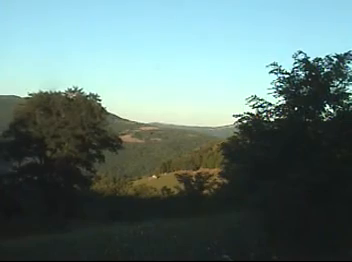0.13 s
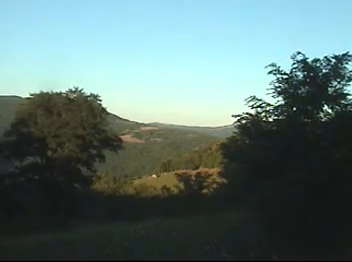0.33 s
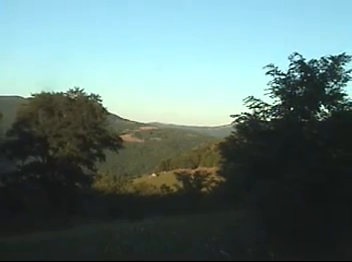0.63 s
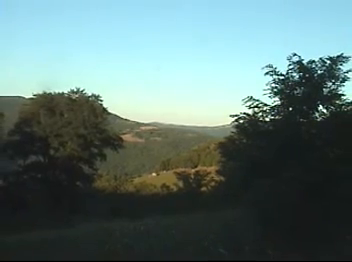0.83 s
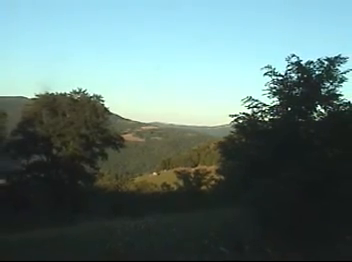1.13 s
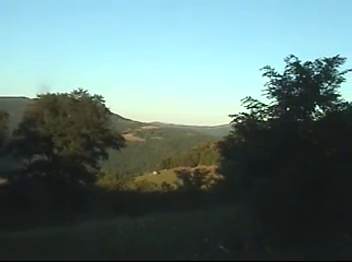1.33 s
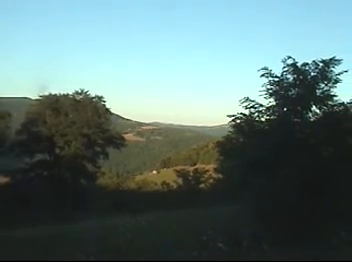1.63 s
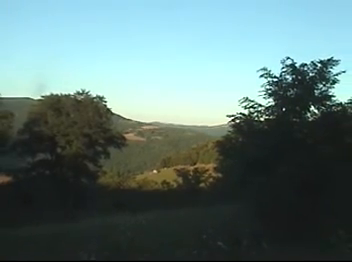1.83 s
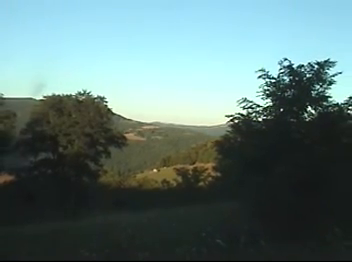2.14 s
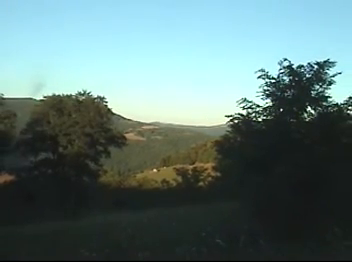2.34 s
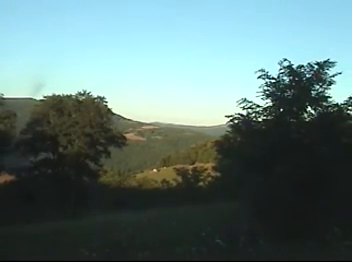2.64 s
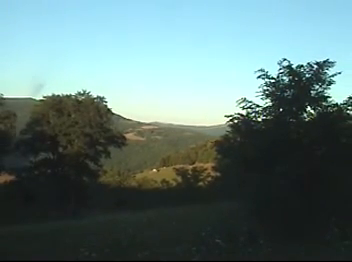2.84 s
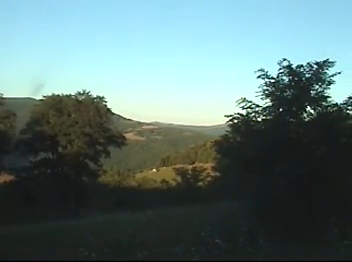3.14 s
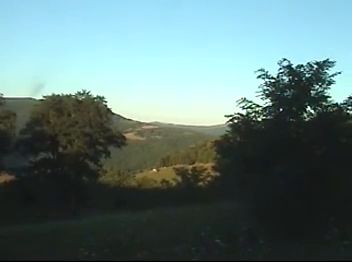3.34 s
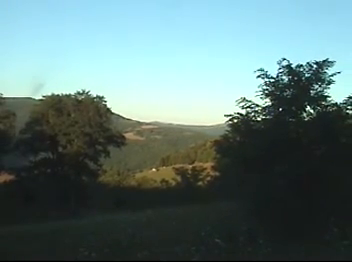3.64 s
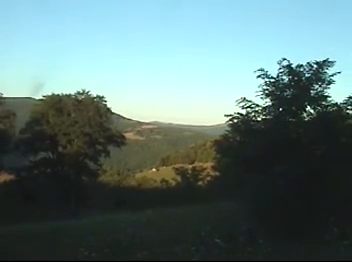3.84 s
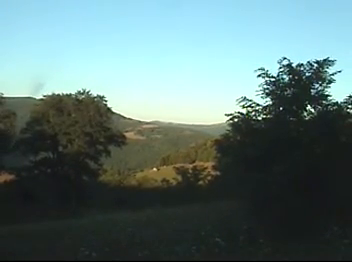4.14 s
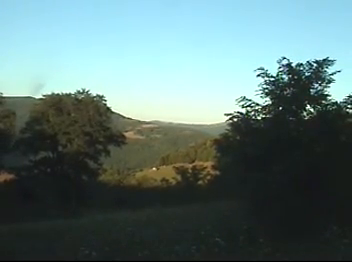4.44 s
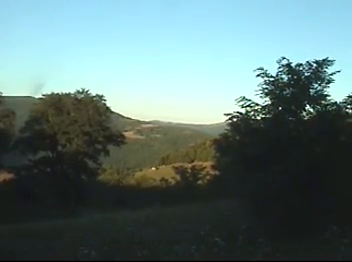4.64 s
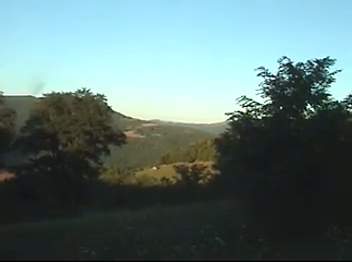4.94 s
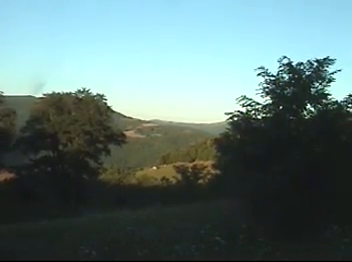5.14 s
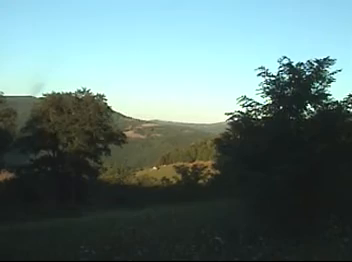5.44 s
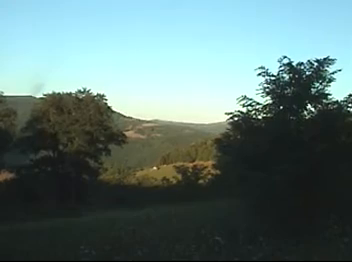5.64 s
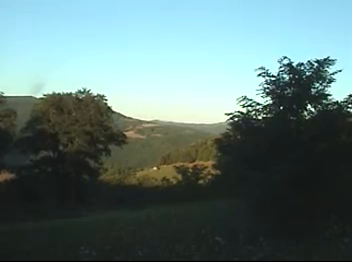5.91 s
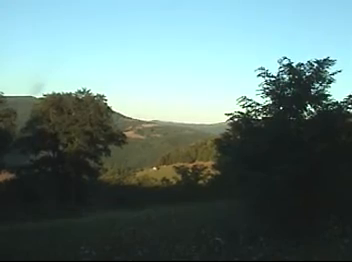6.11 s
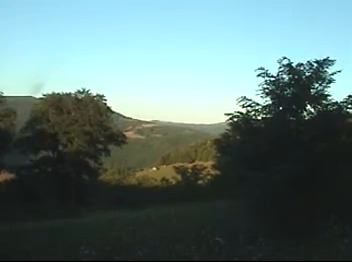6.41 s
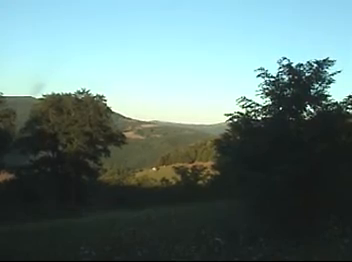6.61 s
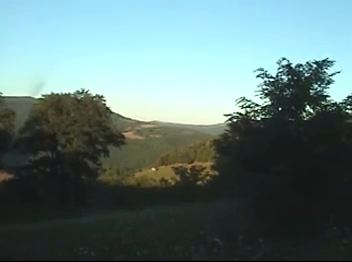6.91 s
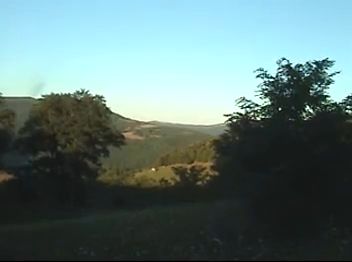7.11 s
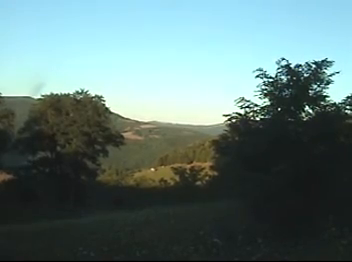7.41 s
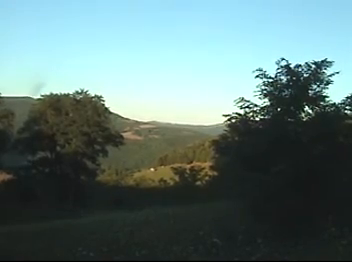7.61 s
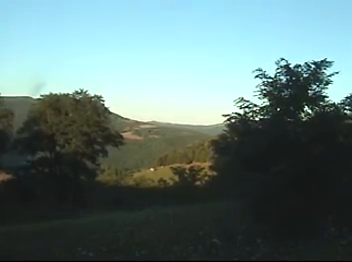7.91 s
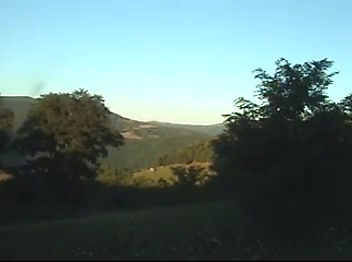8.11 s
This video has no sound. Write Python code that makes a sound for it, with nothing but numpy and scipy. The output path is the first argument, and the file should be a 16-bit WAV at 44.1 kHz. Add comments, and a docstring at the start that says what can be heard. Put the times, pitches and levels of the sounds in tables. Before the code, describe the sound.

Open hillside insects in stereo, with no wind gusts. Near cricket chirps of a few quick pulses lean slightly right, answered by a higher cricket near the centre. A high trill on the left stops after two seconds and a lower one takes over, pausing briefly near six seconds. Crisp rasping runs throughout above a hazy far chorus. Soft camera noise lies beneath, with light handling bumps just before five seconds.

```python
"""A hillside meadow at dusk. Two near crickets answer each other in short chirps of falling wing strokes,
and softer chirps come from further off. Smaller crickets trill higher up, and a far chorus fills the valley.
A bush-cricket rasps six times a second: runs of tooth clicks shape a bright hiss, each closed by a tick.
Shaped noise makes the air. The camcorder's tape motor whines as faint steady tones. Its case is scuffed
(fading noise) and later knocked (ringing resonances); a short bright click of noise is heard in between."""
import sys
import numpy as np
from scipy import signal
from scipy.fft import rfft, irfft, next_fast_len
from scipy.io import wavfile

SR = 44100
rng = np.random.default_rng(int(sys.argv[2]) if len(sys.argv) > 2 else 0)


def master_out(mix):
    """Clip the mix to full scale and print it as 16-bit PCM to the path in sys.argv[1]."""
    frames = np.transpose(np.atleast_2d(mix))
    ceiling = np.clip(frames, -1, 1)
    pcm = np.round(ceiling * 32767).astype(np.int16)
    wavfile.write(sys.argv[1], SR, pcm)


N = 364266
T = np.arange(N) / SR


def undb(db):
    """Turn decibels into a gain."""
    return 10 ** (np.asarray(db) / 20)


def unit(x):
    """Scale a sound to an rms of 1."""
    return x / np.sqrt(np.mean(x ** 2))


def add(track, start_s, sound):
    """Mix a sound into a track, dropping what falls outside it."""
    i = int(round(start_s * SR))
    first, last = max(i, 0), min(i + len(sound), N)
    if last > first:
        track[first:last] += sound[first - i:last - i]


def colour(x, points):
    """Shape a sound's spectrum by (pitch_hz, level_db) points, at an rms of 1."""
    hz, db = np.transpose(points)
    f = np.maximum(np.fft.rfftfreq(N, 1 / SR), 1)
    # above the last point the level drops by 29 dB
    level_db = np.interp(np.log(f), np.log(hz), db, right=db[-1] - 29)
    return unit(irfft(rfft(x) * undb(level_db), N))


def band(x, lo_hz, hi_hz):
    """Keep a band of pitches, with gentle edges."""
    edges = [lo_hz, min(hi_hz, .48 * SR)]
    return signal.sosfilt(signal.butter(2, edges, "band", fs=SR, output="sos"), x)


def place(x, pan_db, lead=.3):
    """Spread a sound over two microphones; the left is pan_db louder and leads by a phase in radians."""
    z = signal.hilbert(x, next_fast_len(N))[:N]
    left = np.real(z * np.exp(.5j * lead)) * undb(pan_db / 2)
    right = np.real(z * np.exp(-.5j * lead)) * undb(-pan_db / 2)
    return np.array([left, right])


def foliage(x, t60_s):
    """Scatter a sound from leaves and slopes: a fading noise tail, different at each microphone."""
    t = T[:SR // 2]
    tail = rng.standard_normal((2, len(t))) * undb(-60 * t / t60_s)
    tail = tail * (t > .008)  # the first 8 ms stay silent
    tail = tail / np.sqrt(np.sum(tail ** 2, axis=1, keepdims=True))
    return signal.fftconvolve(x[None], tail)[:, :N]


def beats(curve):
    """Count off a curve of (time_s, beats_per_s, values ..): one row (time_s, values ..) for each beat."""
    s, rate, *values = np.transpose(curve)
    t = np.linspace(s[0], s[-1], N // 100)
    turns = np.r_[0, np.cumsum(np.interp(t[1:], s, rate) * np.diff(t))]
    times = np.interp(np.arange(turns[-1]), turns, t)
    return np.column_stack([times] + [np.interp(times, s, v) for v in values])


def vary(strokes, looseness=1):
    """Let each wing stroke stray a little in length, pitch and level, as no two are quite alike."""
    # spreads at looseness 1; the length spread is a share of the length
    spread_db, spread_hz, length_spread = 0.32, 13.5, 0.052
    chance = looseness * rng.standard_normal((len(strokes), 3))
    return [(s, length_s * (1 + length_spread * a), hz + spread_hz * b, db + spread_db * c)
            for (s, length_s, hz, db), (a, b, c) in zip(strokes, chance)]


def chirp(pattern, s, hz, db):
    """List the wing strokes of one chirp at a given time, pitch and level."""
    strokes = [(s + offset_s, length_s, hz + up_hz, db + up_db)
               for offset_s, length_s, up_hz, up_db in pattern]
    return vary(strokes)


def trill(curve, length_s, looseness):
    """List an unbroken run of wing strokes that follows a singer's pace, pitch and level."""
    return vary([(s, length_s, hz, db) for s, hz, db in beats(curve)], looseness)


def stroke(length_s, hz, rise, fall, rough, overtone_db, skew):
    """Sound one wing closure: the scraper drives the wing at the tooth rate, and slows towards the end."""
    # upper resonances of a cricket's wing: centre_hz [Hz], width_hz [Hz], gain [factor]
    wing = [(7870, 370, 4.8), (8930, 133, 2.46)]
    count = max(int(length_s * SR), 64)
    u = np.arange(count) / count  # progress through the stroke, 0 to 1
    unevenness = np.interp(u * length_s, np.arange(64) / 1000, rng.standard_normal(64))
    pitch = hz * (1 - rise * (1 - u) ** 3 - fall * length_s * u ** 3 + rough * unevenness)
    phase = 2 * np.pi * (np.cumsum(pitch) / SR + rng.random())
    swell = np.abs(np.sin(np.pi * u ** skew)) ** .72 * (1 + .04 * unevenness)
    # the overtone flares as it slides through the wing's upper resonances
    flare = 1 + sum(gain / (1 + (2 * (2 * pitch - centre) / width) ** 2) for centre, width, gain in wing)
    overtone = undb(overtone_db) * flare * swell * np.sin(2 * phase)
    return swell * (np.sin(phase) + overtone)


def song(strokes, fall, rough, overtone_db, skew=(1.2, .8), rise=0):
    """Play wing strokes; each starts flat by the share rise and sinks by fall, a share per second of length."""
    out = np.zeros(N)
    for s, length_s, hz, db in strokes:
        # skew goes from short strokes to long ones: above 1 the swell peaks late, below 1 early
        shape = np.interp(length_s, (.021, .029), skew)
        add(out, s, undb(db) * stroke(length_s, hz, rise, fall, rough, overtone_db, shape))
    return out


def air():
    """Soft outdoor rumble and hiss: noise with its own spectrum at each microphone."""
    # still air and microphone hiss, before each side is set to its own level:
    # pitch_hz [Hz], relative level_db [dB], left minus right pan_db [dB]
    air_spectrum = [(25.5, -11, 2), (45.6, -6, 2), (103, -1, -0.5), (191, -2, -1.5), (322, 1, -3),
                    (571, 1, -3.5), (1000, -2.5, 1.5), (2080, -7, -5), (2600, -6, -3), (3100, -9, -4.5),
                    (3950, -5.5, -4), (7850, -9.5, 0), (9900, -8.5, -0.5), (11400, -10.5, 2),
                    (13800, -11.5, -1.5)]
    mid, side = rng.standard_normal((2, N))
    # widened stereo: more side sound in this band sets the two microphones against each other
    side = side + undb(-8) * band(side, 73, 3200)
    left = colour(mid + side, [(hz, db + pan_db / 2) for hz, db, pan_db in air_spectrum])
    right = colour(mid - side, [(hz, db - pan_db / 2) for hz, db, pan_db in air_spectrum])
    return np.array([undb(-59.0) * left, undb(-57.5) * right])


def motor():
    """The tape drive's steady tones waver a little and reach both microphones through the case."""
    # tape motor and mains tones: pitch_hz [Hz], base level_db [dB rms, before the wavering below]
    motor_tones = [(60, -83), (922, -79), (1093, -81), (1378, -75.5), (1791, -86), (2327, -85), (2490, -87),
                   (2620, -86), (2687, -86), (2756, -84), (2912, -86), (3493, -86), (6891, -86),
                   (12403, -87)]
    # extra level of the tones near 1 kHz, which grow louder: time_s [s], level_db [dB]
    grip = [(0, -5), (2.2, -2), (3.0, 1.5), (8.2, 1)]
    whine = np.zeros((2, N))
    grip_db = np.interp(T, *np.transpose(grip))
    knots_s = np.linspace(0, T[-1], 80)
    for hz, db in motor_tones:
        flutter, left, right = (np.interp(T, knots_s, r) for r in rng.standard_normal((3, 80)))
        phase = 2 * np.pi * (np.cumsum(hz + 1.17 * flutter) / SR + rng.random())
        gripped = 800 < hz < 1200
        level_db = db + gripped * grip_db + 2.4 * np.array([left, right])
        whine += np.sqrt(2) * undb(level_db) * np.sin(phase)
    return whine


def chorus(count=20):
    """Many distant crickets chirp at their own pitch and pace, over a noise haze of still more."""
    # blurred song of the whole valley: pitch_hz [Hz], relative level_db [dB]
    valley = [(3500, -28), (4000, -15), (4400, -1.5), (4620, -8.5), (4850, -14.5), (5050, -3), (5450, -17),
              (5850, -14), (6300, -6.5), (6650, -15.5), (7100, -15.5)]
    strokes = []
    for pitch, (pace, offset) in zip(np.linspace(0, 1, count), rng.random((count, 2))):
        interval_s = .45 + .2 * pace
        for chirp_s in (np.arange(-1, 19) + offset) * interval_s:
            start = chirp_s + 0.033 * rng.standard_normal()
            hz = 4680 + 400 * pitch + 25 * rng.standard_normal()
            # three strokes climb in pitch and level; higher singers are softer
            strokes += [(start + .052 * k, .025, hz + 30 * k, k - 4 * pitch ** 2) for k in range(3)]
    voices = unit(song(strokes, fall=4.83, rough=0.003, overtone_db=-14.5))
    # part of the haze is shared by both sides, part is separate
    haze = colour(rng.standard_normal(N) + 1.26 * rng.standard_normal((2, N)), valley)
    singers = place(voices, pan_db=0.5) + 0.8 * foliage(voices, t60_s=0.41)
    return undb(-63.0) * singers + undb(-61.0) * haze


def bush_cricket(length_s=0.072, snap_db=5, snap_s=0.0037):
    """A swelling run of tooth clicks on a damped wing, closed by one bright falling tick."""
    # pace and effort: rasp end_s [s], rasps_per_s [1/s], base level_db [dB, before random spread and mix]
    rasping = [(0.055, 5.98, -62.0), (0.7, 6.4, -62.5), (1.2, 6.15, -60.0), (2.3, 6.02, -61),
               (2.65, 5.44, -64), (3.2, 6.15, -63), (4.45, 6.19, -62.5), (5.6, 6.17, -64.5),
               (5.8, 6.14, -59.5), (7.2, 6.11, -61.5), (7.7, 6.06, -67.5), (8.0, 6.2, -62),
               (8.26, 5.49, -62)]
    tooth_hz, click_decay_s, spread_db = 520, .0009, 1.0
    teeth, snaps = np.zeros(N), np.zeros(N)
    t = T[:int(snap_s * SR)]
    snap = np.hanning(len(t)) * signal.chirp(t, 14000, snap_s, 9600)
    for s, db in beats(rasping):
        db = db + spread_db * rng.standard_normal()
        chance = rng.standard_normal((2, 64))
        # the teeth are counted backwards from the end of the rasp, in seconds
        before = 0.0037 + np.cumsum(1 + .06 * chance[0]) / tooth_hz
        force = np.clip(1 - before / length_s, 0, 1) ** .5 * undb(db + chance[1])
        at = np.round((s - before) * SR).astype(int)
        heard = (at >= 0) & (at < N)
        teeth[at[heard]] += force[heard]
        add(snaps, s - snap_s, undb(db + snap_db + 2 * rng.standard_normal()) * snap)
    # each click dies away quickly and shapes a bright hiss
    ring = signal.lfilter([1], [1, -np.exp(-1 / (click_decay_s * SR))], teeth)
    rasp = ring * unit(band(rng.standard_normal(N), 9350, 12600))
    return place(undb(4.5) * rasp + snaps, pan_db=4.5, lead=0.34)


def trillers():
    """Smaller crickets stroke in long even runs; a weaker low one joins, and the high one returns softly."""
    # the next three tables: time_s [s], strokes_per_s [1/s], pitch_hz [Hz], level_db [dB peak, before mix]
    # the high triller on the left hurries once and pauses after two seconds
    high_trill = [(0.028, 14.13, 6700.0, -55.2), (0.47, 15.2, 6650.0, -54.7), (0.59, 17.71, 6570.0, -55.2),
                  (0.73, 14.05, 6650.0, -54.7), (1.6, 13.51, 6680.0, -55.2), (2.15, 14.35, 6640.0, -53.7)]
    # two bouts of the lower triller; each starts fast and flat, then slows as its pitch rises
    first_bout = [(1.4, 13.78, 6110, -65), (1.9, 13.64, 6140, -57.5), (2.35, 13.04, 6320, -58),
                  (3.3, 12.62, 6360, -55.5), (3.9, 12.93, 6370, -56.0), (5.2, 12.4, 6400.0, -55.5),
                  (5.87, 12.09, 6480, -56.2)]
    second_bout = [(6.475, 15, 6200.0, -57.5), (6.9, 14, 6220, -57), (7.4, 13.12, 6400, -56),
                   (8.25, 12.68, 6510, -55)]
    # a weaker low triller joins, and the high triller returns softly:
    # start_s [s], end_s [s], strokes_per_s [1/s], pitch_hz [Hz], level_db [dB peak, before mix]
    soft_trills = [(5.288, 7.3, 12.1, 6320, -62), (6.327, 7.5, 13.2, 6600, -63)]
    high_stroke_s, low_stroke_s, rough = 0.022, 0.0275, .003

    high_strokes = trill(high_trill, high_stroke_s, looseness=2.3)
    high = song(high_strokes, rise=.05, fall=4.0, rough=rough, overtone_db=-36, skew=(1, 1.1))
    low_strokes = [row for bout in (first_bout, second_bout) for row in trill(bout, low_stroke_s, looseness=3.8)]
    low = song(low_strokes, fall=5.4, rough=rough, overtone_db=-39, skew=(1.15, 1.25))
    soft_strokes = [(s + 0.0018 * rng.standard_normal(), .024, hz, db)
                    for start, end, rate, hz, db in soft_trills for s in np.arange(start, end, 1 / rate)]
    soft = song(vary(soft_strokes, looseness=2.8), fall=5.1, rough=rough, overtone_db=-34)

    direct = place(high, pan_db=7.5, lead=0.22) + place(low, pan_db=3.0, lead=0.22) + place(soft, pan_db=5)
    return direct + undb(-14) * foliage(high + low + soft, t60_s=0.27)


def crickets():
    """Chirping crickets close their wings in quick strokes, each from its own side, with a little scatter."""
    # the nearest cricket repeats one chirp about twice a second: time_s [s]
    near_chirps = [0.278, 0.779, 1.331, 1.81, 2.315, 2.832, 3.35, 3.885, 4.398, 4.947, 5.716, 6.268, 6.802,
                   7.408, 7.945]
    # the patterns: offset_s [s], length_s [s], pitch offset_hz [Hz], level offset_db [dB]
    # the nearest cricket's chirp: a soft opener and three loud wing strokes
    near_pattern = [(-0.076, 0.0095, -320, -10.5), (-0.046, 0.026, -46, -1.3), (0, 0.0305, 5, 0),
                    (0.056, 0.032, 8.5, 0)]
    # its higher-pitched neighbour, some chirps cut short:
    # last_stroke_s [s], pitch_hz [Hz], level_db [dB peak, before mix], strokes [count]
    neighbour_chirps = [(0.896, 4760, -37.5, 2), (1.82, 4710, -43, 1), (2.858, 4800, -37, 3),
                        (3.543, 4790, -36.7, 3), (4.603, 4800, -37, 2), (5.874, 4830, -36.5, 3),
                        (6.453, 4830, -35.8, 3), (7.336, 4840, -35.6, 3), (7.83, 4850, -35.5, 3)]
    # the neighbour's chirp climbs in pitch and level
    neighbour_pattern = [(-0.103, 0.0202, -175, -5), (-0.055, 0.027, -54, -1), (0, 0.026, -6, 0)]
    # chirps from further off: last_stroke_s [s], pitch_hz [Hz], level_db [dB peak, before mix]
    far_chirps = [(1.639, 4660, -49), (1.989, 4380, -52), (2.195, 4630, -49), (2.975, 4690, -48),
                  (4.16, 4310, -54), (5.295, 4620, -51.5), (5.615, 4370, -52.5), (6.54, 4730, -51),
                  (6.995, 4600, -58.5)]
    # the chirp of the further ones, which also climbs
    far_pattern = [(-0.098, 0.0203, -38, -5.5), (-0.051, 0.021, -10, -1), (0, 0.019, -6, -0.5)]
    near_hz, near_db, rough = 4446, -34.5, .0035

    near_strokes = [row for s in near_chirps for row in chirp(near_pattern, s, near_hz, near_db)]
    near = song(near_strokes, fall=5.56, rough=rough, overtone_db=-26.5)
    # the wings brush each other faintly as they open again after a stroke
    openings = [(s + length_s + 0.007, .012, .89 * hz, db - 24.5) for s, length_s, hz, db in near_strokes]
    near = near + song(openings, fall=6.0, rough=.012, overtone_db=-30)

    # a chirp cut short keeps only its last strokes
    answers = [row for s, hz, db, count in neighbour_chirps
               for row in chirp(neighbour_pattern[-round(count):], s, hz, db)]
    neighbour = song(answers, fall=5.5, rough=rough, overtone_db=-26, skew=(1.05, .7))
    distant = [row for s, hz, db in far_chirps for row in chirp(far_pattern, s, hz, db)]
    far = song(distant, fall=5.6, rough=rough, overtone_db=-42)

    scatter = undb(-24) * foliage(near + neighbour + 2 * far, t60_s=.2)
    near = place(near, pan_db=-3.6, lead=.33)
    return near + place(neighbour, pan_db=1.0, lead=.28) + place(far, pan_db=5.5) + scatter


def scuff_click_and_knock():
    """A finger scuffs the camera case, a short bright click of noise sounds, then a knock rings the case."""
    # resonances of the camera case: pitch_hz [Hz], relative level_db [dB], time to fade by 60 dB t60_s [s]
    case = [(130, -15, 0.043), (330, -0.5, 0.063), (510, -1, 0.02), (685, -12, 0.033), (1120, -21, .04),
            (2050, -7, .012)]
    t = T[:SR // 8]

    def noise_burst(lo_hz, hi_hz, t60_s):
        """Make a burst of noise in one band that fades away."""
        return undb(-60 * t / t60_s) * unit(band(rng.standard_normal(len(t)), lo_hz, hi_hz))

    bumps = np.zeros(N)
    low_scuff = undb(-55) * noise_burst(530, 1000, t60_s=.09)
    middle_scuff = undb(-51) * noise_burst(1400, 3300, t60_s=.057)
    add(bumps, 4.455, low_scuff + middle_scuff)
    bright_click = undb(-49) * noise_burst(3500, 11000, t60_s=.025)
    add(bumps, 4.464, bright_click)
    knock = sum(undb(db - 60 * t / t60_s) * np.sin(2 * np.pi * hz * t) for hz, db, t60_s in case)
    add(bumps, 4.778, undb(-44.0) * knock)
    return place(band(bumps, 70, 20000), pan_db=-4.0)


def scene():
    """Mix the air, the insects near and far, the camera's sounds and the bright click."""
    return air() + motor() + chorus() + bush_cricket() + trillers() + crickets() + scuff_click_and_knock()


def record(dry):
    """The recorder cuts the top of the treble with a steep low-pass filter."""
    top_hz = 14100
    return signal.sosfilt(signal.ellip(10, .2, 70, top_hz, fs=SR, output="sos"), dry)


dry = scene()
out = record(dry)
master_out(out)
```